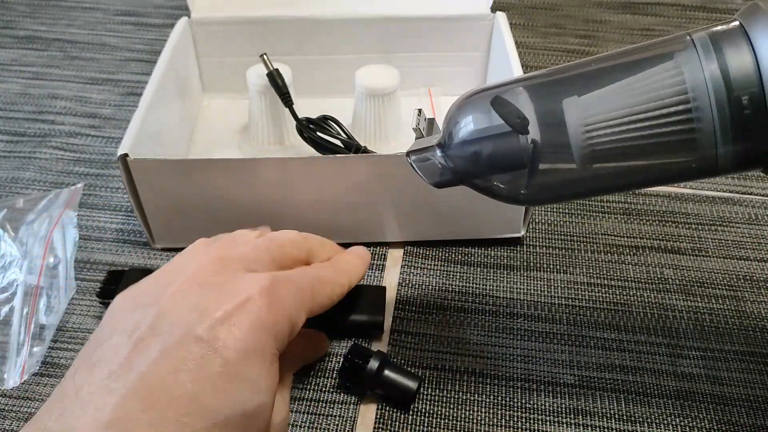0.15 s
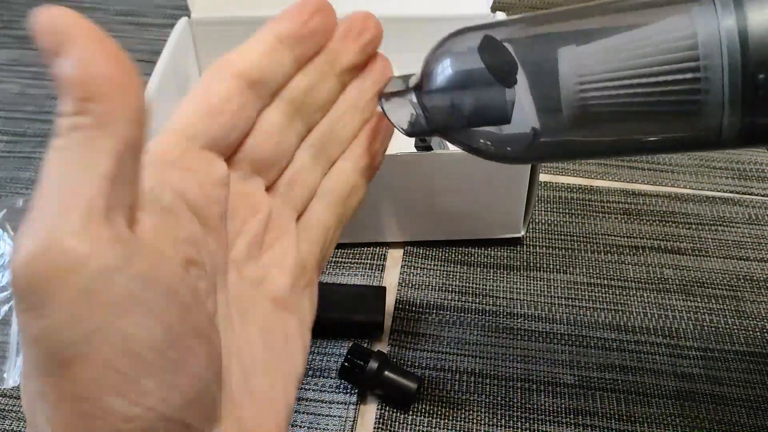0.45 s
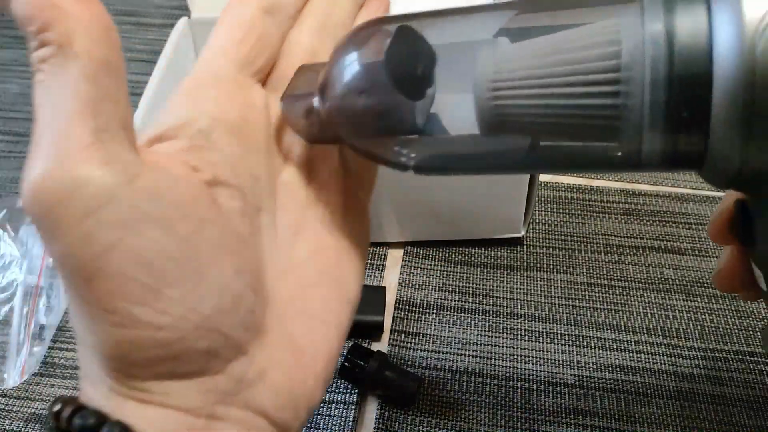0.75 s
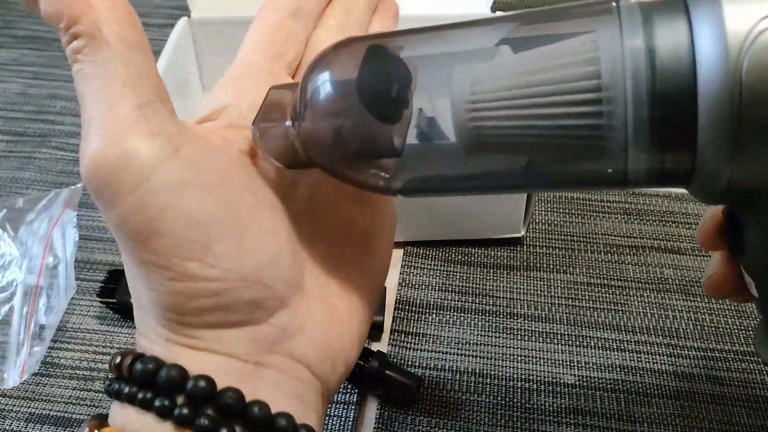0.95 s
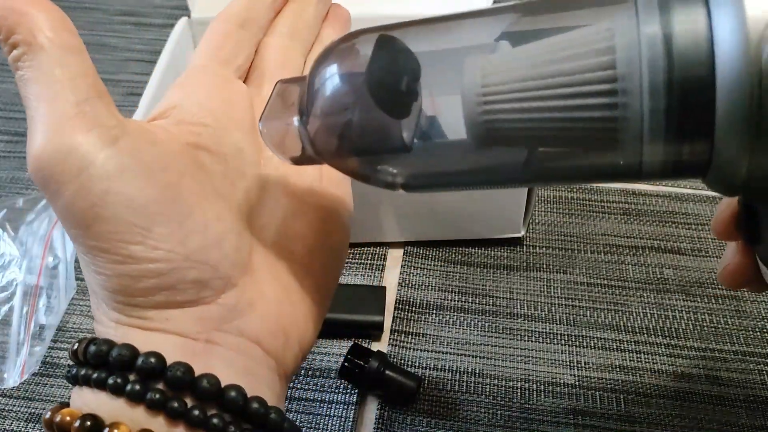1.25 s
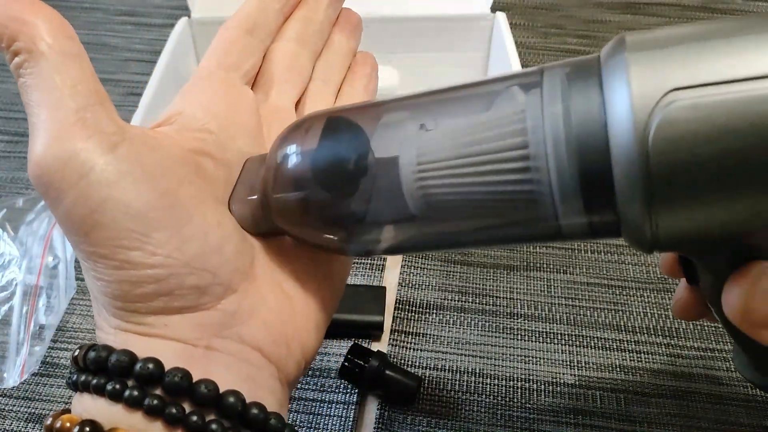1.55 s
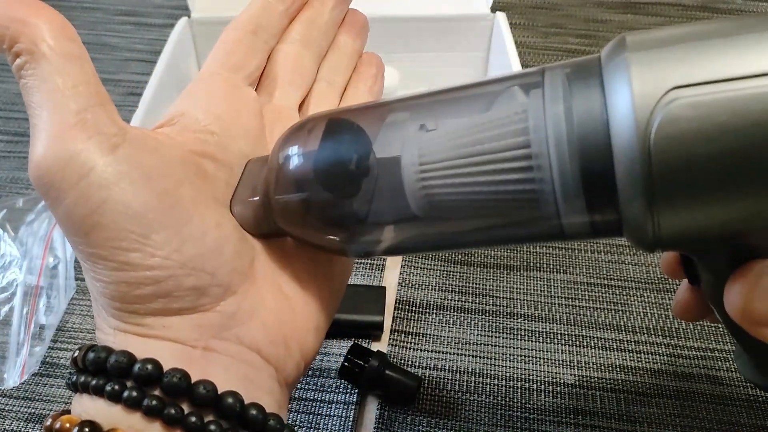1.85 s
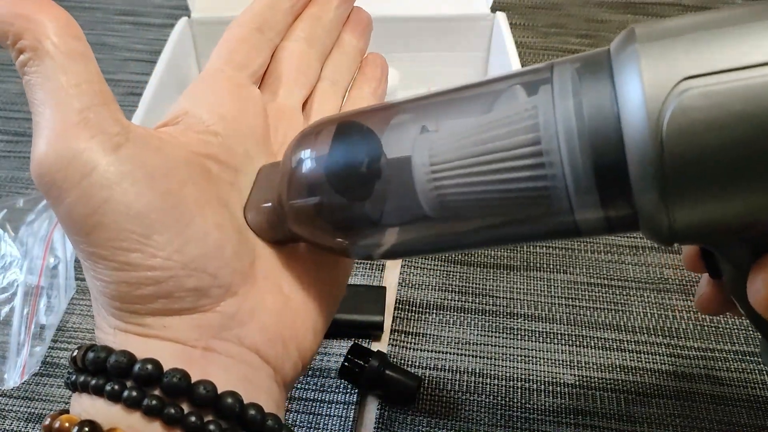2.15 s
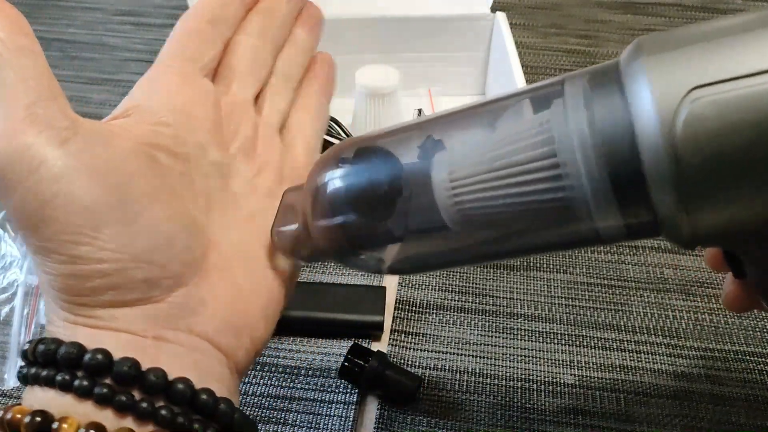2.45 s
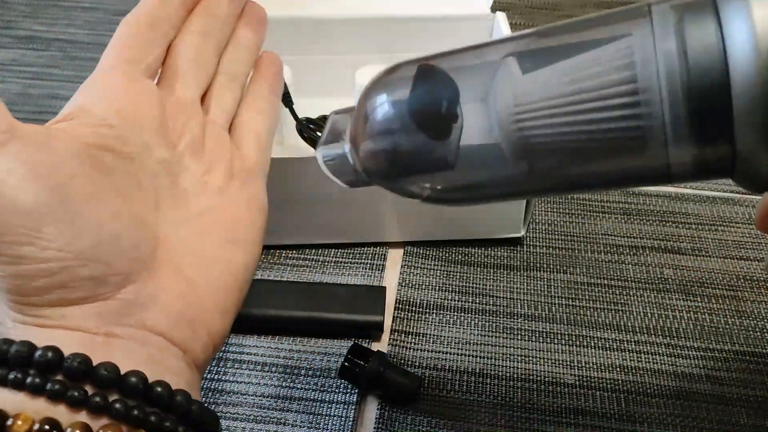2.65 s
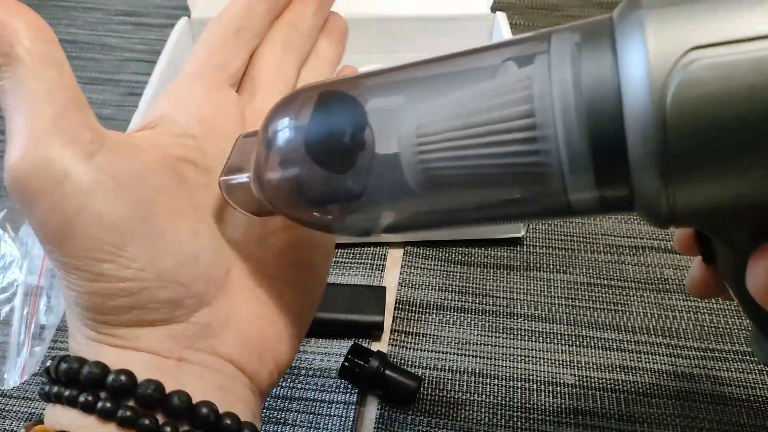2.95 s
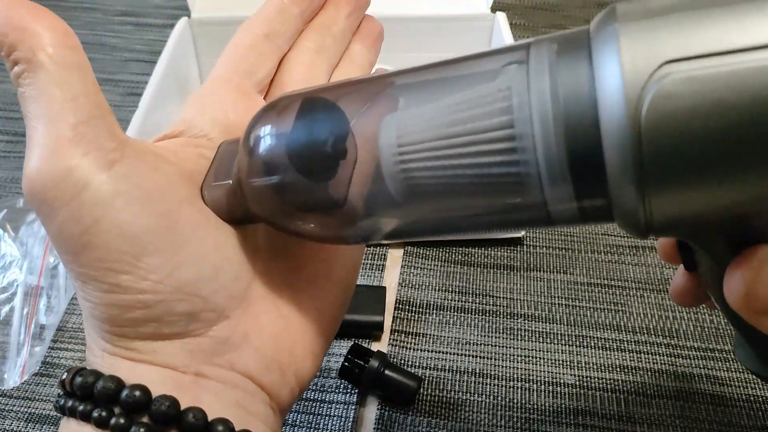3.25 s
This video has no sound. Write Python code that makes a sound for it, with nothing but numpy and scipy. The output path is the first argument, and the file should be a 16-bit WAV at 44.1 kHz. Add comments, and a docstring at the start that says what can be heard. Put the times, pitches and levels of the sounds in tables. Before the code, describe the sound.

A small cordless vacuum runs throughout, close to a stereo microphone: a clear high motor whine with overtones, bearing tones, rushing intake air, hiss and low puffs. At about 1.6 seconds a palm seals the nozzle with a soft thud; the air noise dies and the whine glides up, harder and rougher. Around 2.5 seconds air rushes back and pitch sinks. At 3.25 it is sealed again, to the end.

```python
"""Palm over a small vacuum's nozzle

A small cordless vacuum runs close to a stereo pair of microphones: a clean shaft whine with overtones,
ball-bearing tones, motor and exhaust noise, rushing intake air and low puffs of stray air.
Twice a palm seals the intake with a soft thud: rush, hiss, whistle and puffs die, and the unloaded fan
spins up and sings harder. After the first seal the palm lets go and it sinks back; the second lasts to the end."""
import sys
import numpy as np
from scipy import signal
from scipy.fft import rfft, irfft
from scipy.io import wavfile

SR = 44100
rng = np.random.default_rng(int(sys.argv[2]) if len(sys.argv) > 2 else 0)


def put_to_file(sound):
    """Save the sound as 16-bit audio at rate SR, in the file named by the first command-line argument."""
    columns = np.atleast_2d(sound).T  # one column per channel
    safe = np.clip(columns, -1, 1)
    whole_steps = np.round(safe * 32767)
    wavfile.write(sys.argv[1], SR, whole_steps.astype(np.int16))


N = 149940

LEFT_RIGHT = np.array([[1], [-1]])   # signs that split a difference between the two microphones


def from_db(db):
    """Decibels to amplitude gain."""
    return 10 ** (np.asarray(db) / 20)


def in_time(rows):
    """Each column of a curve, read at every sample; the first column is t/s."""
    t, *columns = np.transpose(rows)
    return [np.interp(np.arange(N) / SR, t, column) for column in columns]


def at_hz(points, hz):
    """A spectrum read on a log-frequency axis."""
    f, value = np.transpose(points)
    return np.interp(np.log(hz + 1), np.log(f), value)


def drift(rate_hz):
    """Random wandering with mean 0 and spread 1, its motion damped above the given rate."""
    drift_sr = 1000
    hz = np.fft.rfftfreq(4096, 1 / drift_sr)
    noise = rng.standard_normal(2 * len(hz) - 2)
    slow = irfft(rfft(noise) / (1 + (hz / rate_hz) ** 2))
    slow = np.interp(np.arange(N) / SR * drift_sr, np.arange(len(slow)), slow)
    return (slow - slow.mean()) / slow.std()


def lag(x, seconds):
    """Follows x with the given time constant."""
    r = np.exp(-1 / (seconds * SR))
    return signal.lfilter([1 - r], [1, -r], x)


def pan(db):
    """Left and right gains of constant power for a left minus right difference in dB."""
    gains = from_db(LEFT_RIGHT * db / 2)
    return gains / np.sqrt(np.mean(gains ** 2, axis=0))


def air_noise(spectrum):
    """Gently swirling noise: alike at both microphones in the low mids, opposed near 2-3 kHz, unrelated above."""
    # balance of the noise between the microphones: f/Hz, left minus right/dB
    balance = [(60, -3), (130, 1.5), (400, 0.8), (800, 0), (2400, 0.5), (3500, 3), (4900, -0.5),
               (5900, -4.5), (7000, -3), (7900, -2), (10000, 0), (12800, -3.5), (15000, -12.5)]
    # correlation of the noise at the two microphones: f/Hz, likeness (-1 to 1)
    likeness = [(50, -0.084), (130, 0.89), (300, 0.95), (640, 0.71), (1500, 0.0051), (2150, -0.69),
                (2850, -0.83), (3400, -0.15), (7000, -0.00033), (15000, 0.0076)]
    swirl_db, swirl_hz = 1.23, 20
    hz = np.fft.rfftfreq(N, 1 / SR)
    mid, side = rfft(rng.standard_normal((2, N)))
    alike = np.clip(at_hz(likeness, hz), -1, 1)
    both = np.sqrt((1 + alike) / 2) * mid + np.sqrt((1 - alike) / 2) * side * LEFT_RIGHT
    shaped = both * pan(at_hz(balance, hz)) * from_db(at_hz(spectrum, hz))
    # sqrt(SR / 2) turns level per Hz into amplitude
    return irfft(shaped, N) * np.sqrt(SR / 2) * from_db(swirl_db * drift(swirl_hz))


def buffet():
    """Stray air buffets the microphones in lumpy low puffs, stronger on the right."""
    # noise density before the level curve: f/Hz, density/dB per Hz
    puff_spectrum = [(25, -75), (70, -79), (120, -82), (250, -100)]
    # gain on that density: t/s, level/dB
    puff_level = [(0, 3), (.22, 3), (.27, 15), (.33, -3), (.52, -5), (.62, -7), (1.1, -8.5), (1.22, 10),
                  (1.6, 0), (2.55, 2), (2.66, 11), (2.8, -5), (3.0, 9), (3.24, 1)]
    lump_db, lump_hz, pan_db = 3, 13, -10
    level_db, = in_time(puff_level)
    return air_noise(puff_spectrum) * from_db(level_db + lump_db * drift(lump_hz)) * pan(pan_db)


def exhaust(strain, near_db):
    """Motor and exhaust noise, always there: louder under a sealed intake and slightly louder up close."""
    # noise density with the intake sealed: f/Hz, density/dB per Hz
    exhaust_spectrum = [(30, -80), (55, -81), (95, -82), (140, -78.5), (210, -67), (350, -63.5), (430, -71),
                        (700, -68), (1050, -70.5), (1500, -69.5), (2050, -63), (2500, -54), (3200, -55),
                        (3700, -57.5), (4300, -56), (5100, -56), (6500, -59), (7600, -62), (8300, -69.5),
                        (10300, -70), (12000, -74), (15500, -76)]
    open_db, nearness_share = -6, 0.2
    return air_noise(exhaust_spectrum) * from_db(open_db * (1 - strain) + nearness_share * near_db)


def nozzle_whistle():
    """A breathy whistle at the nozzle's edge: noise through two equal resonators in a row."""
    # whistle with the nozzle open: t/s, level/dB
    whistle_level = [(0, -23), (.42, -23), (.6, -31.5), (.9, -27), (1.1, -21.5), (1.33, -20.5),
                     (1.48, -19.5), (1.58, -31.5), (1.65, -22.5), (2.55, -25), (2.68, -25), (2.87, -25.5),
                     (2.98, -20), (3.1, -22), (3.25, -19.5)]
    whistle_hz, resonator_width_hz, pan_db = 11480, 950, -7
    level_db, = in_time(whistle_level)
    b, a = signal.iirpeak(whistle_hz, whistle_hz / resonator_width_hz, fs=SR)
    once = signal.lfilter(b, a, rng.standard_normal((2, N)))
    breath = signal.lfilter(b, a, once)
    return breath / breath.std() * from_db(level_db) * pan(pan_db)


def intake():
    """Air drawn through the open nozzle: low rush, hiss of nozzle and filter, and a high whistle."""
    # noise densities before their level curves: f/Hz, density/dB per Hz
    rush_spectrum = [(30, -87), (95, -80), (135, -62.5), (205, -53.5), (240, -57), (280, -55.5), (430, -57),
                     (458, -48.5), (490, -62.5), (545, -61), (630, -85), (790, -67.5), (1000, -99)]
    hiss_spectrum = [(500, -77.5), (900, -67.5), (1250, -66), (1550, -54.5), (2000, -60), (2400, -61),
                     (2850, -88), (3450, -52), (4150, -60), (4750, -53.5), (5800, -52.5), (7000, -54.5),
                     (8050, -68), (8600, -63.5), (10000, -66), (11500, -63.5), (13000, -64.5),
                     (15500, -68.5)]
    # gains on those densities: t/s, level/dB
    rush_level = [(0, 3.5), (.38, 3.5), (.5, -.5), (.85, -2.5), (1.05, -1), (1.38, 2.5), (1.6, -3.5),
                  (2.55, -1.5), (2.65, 4), (2.95, 1.5), (3.24, -1)]
    hiss_level = [(0, -0.6), (.45, 0.7), (.8, -1.4), (1.3, -.5), (1.6, -0.5), (2.57, 0), (2.8, -1.5),
                  (3.24, -1)]
    rush_db, = in_time(rush_level)
    hiss_db, = in_time(hiss_level)
    rush = from_db(rush_db) * air_noise(rush_spectrum)
    hiss = from_db(hiss_db) * air_noise(hiss_spectrum)
    return rush + hiss + nozzle_whistle()


def thuds():
    """The air column stops against the palm with a short low push."""
    # the palm meets the nozzle: t/s, envelope peak level/dB
    palm_hits = [(1.622, -36), (3.25, -38)]
    thud_hz, decay_s, pan_db = 60, 0.0063, -2
    out = np.zeros(N)
    for start_s, db in palm_hits:
        age = np.maximum(np.arange(N) / SR - start_s, 0)
        envelope = age / decay_s * np.exp(1 - age / decay_s)
        out += from_db(db) * envelope * np.sin(2 * np.pi * thud_hz * age)
    return out * pan(pan_db)


def shaft_angle(spin):
    """The shaft's running angle in radians, between its open and its sealed speed."""
    open_hz, sealed_hz, wobble_hz = 1191.5, 1324.3, 0.72
    hz = open_hz + (sealed_hz - open_hz) * spin + wobble_hz * drift(6)
    return 2 * np.pi * np.cumsum(hz) / SR


def tone(phasor, db, pan_db, lead_rad, seal):
    """One machine tone: open-intake air blurs it most, and its path to each microphone wanders."""
    flutter_open, flutter_sealed, flutter_hz = .27, .08, 35
    fade_db, path_wander_rad, path_hz = 1.1, .25, 2.5
    depth = flutter_open + (flutter_sealed - flutter_open) * seal
    flutter = 1 + depth * (drift(flutter_hz) + 1j * drift(flutter_hz))
    paths = []
    for side in (1, -1):   # left, right
        phase = path_wander_rad * drift(path_hz) + side * lead_rad / 2
        paths.append(from_db(fade_db * drift(path_hz)) * np.exp(1j * phase))
    start = np.exp(2j * np.pi * rng.random())
    wave = np.real(np.array(paths) * flutter * phasor * start)
    return wave / wave.std() * from_db(db) * pan(pan_db)


def bearing(angle, strain, spin, seal):
    """Two ball bearings add tones; the weaker rear one grows with speed, and sealed the pair beats 23 times a second."""
    # tones at whole shaft turns plus or minus the ball-pass rate; levels before nearness:
    # shaft turns, sign, open level/dB, sealed level/dB, left minus right/dB, left's lead/rad,
    # rear bearing relative to front at sealed speed/dB
    ball_tones = [(-2, 1, -45.5, -40.5, -2, 0, -25), (5, -1, -45, -24.5, -2, -2.2, -22),
                  (0, 1, -32, -25, -3, .2, -2), (6, -1, -35.5, -32, -2, .3, -9),
                  (1, 1, -37, -38, -3, 2.0, -12), (7, -1, -37.5, -38, -2, 1.4, -14),
                  (2, 1, -42, -42, -4, 1.5, -3)]
    front_pass, rear_pass = 2.883, 2.9007   # ball passes per shaft turn
    slip_rad, slip_hz = 0.14, 5.6
    rear_open_db = -9   # the rear bearing's drop at open speed
    front = front_pass * angle + slip_rad * drift(slip_hz)
    rear = rear_pass * angle + slip_rad * drift(slip_hz)
    out = 0
    for turns, sign, open_db, sealed_db, pan_db, lead_rad, rear_db in ball_tones:
        rear_share = from_db(rear_db + rear_open_db * (1 - spin ** 2))
        balls = np.exp(1j * sign * front) + rear_share * np.exp(1j * sign * rear)
        db = open_db + (sealed_db - open_db) * strain
        out = out + tone(np.exp(1j * turns * angle) * balls, db, pan_db, lead_rad, seal)
    return out


def overtones(angle, rise, seal):
    """Multiples of the shaft rate: with the fan's rise most grow and shift phase between the microphones."""
    # levels before nearness: multiple of shaft rate, open level/dB, sealed level/dB,
    # left minus right/dB, left's lead open/rad, left's lead sealed/rad
    shaft_multiples = [(2, -30.5, -24.5, 4, -.7, -2.0), (3, -33, -28.5, -3, -2.0, .5),
                       (4, -27.5, -23.5, -3, 2.5, 6.6), (5, -38, -33.5, -7, .8, 3.6),
                       (6, -41, -41, -5, 1, 1)]
    out = 0
    for multiple, open_db, sealed_db, pan_db, open_rad, sealed_rad in shaft_multiples:
        db = open_db + (sealed_db - open_db) * rise
        lead_rad = open_rad + (sealed_rad - open_rad) * rise
        out = out + tone(np.exp(1j * multiple * angle), db, pan_db, lead_rad, seal)
    return out


def whine(angle):
    """The clean once-per-turn tone of the shaft, wavering as the vacuum is moved about."""
    # whine before its waver: t/s, level/dB, left minus right/dB
    whine_level = [(0.03, -25, -20), (0.09, -23.5, -17), (0.28, -23.5, -16), (0.42, -23, -19),
                   (0.5, -22, -13.5), (0.81, -25, -9), (1.01, -22.5, -5.5), (1.47, -22.5, -7),
                   (1.58, -25, -5), (1.65, -21.5, -5.5), (1.76, -20, 2.0), (1.81, -22, -9),
                   (1.86, -19.5, 0), (2.29, -20, 0.5), (2.41, -19.5, 5), (2.56, -19, -0.5), (2.58, -22, -4),
                   (2.69, -22, -1.5), (2.73, -23, 5), (2.81, -19, -4.5), (3.03, -21.5, 0.5),
                   (3.2, -23, -0.5), (3.3, -19, -2), (3.38, -19.5, 3.5)]
    lead_rad, waver_db, waver_hz = -0.34, 0.76, 26   # lead of the left microphone
    db, pan_db = in_time(whine_level)
    gain = np.sqrt(2) * from_db(db + waver_db * drift(waver_hz))   # sqrt(2): the level is RMS
    return gain * pan(pan_db) * np.sin(angle + lead_rad / 2 * LEFT_RIGHT)


def scene():
    """The seal chokes the intake and the fan speeds up, lagging by its inertia; bearing tones follow the palm quickly."""
    # how far the palm seals the intake: t/s, seal (0 open to 1 sealed)
    palm_seal = [(0, 0.02), (1.61, 0), (1.665, 0.98), (2.515, 1), (2.565, 0), (3.23, 0), (3.28, 0.93),
                 (3.4, 1)]
    # overtones and bearing tones as the motor is brought closer: t/s, level/dB
    nearness = [(0, -7.5), (.35, -5), (.65, -0.5), (1.5, 2.2), (2.0, 0.6), (3.4, 0.5)]
    spin_lag_s, strain_rise_s, strain_fall_s = .208, 0.045, 0.027
    seal = np.clip(in_time(palm_seal)[0], 0, 1)
    near_db, = in_time(nearness)
    spin = lag(seal, spin_lag_s)
    # the lower of two lags: a slower rise than fall
    strain = np.minimum(lag(seal, strain_rise_s), lag(seal, strain_fall_s))
    angle = shaft_angle(spin)
    # overtones swell late with the fan's speed and drop fast at release
    rise = np.minimum(spin ** 2, strain)
    near_tones = overtones(angle, rise, seal) + bearing(angle, strain, spin, seal)
    motor = whine(angle) + from_db(near_db) * near_tones
    open_air = (1 - seal) * (intake() + buffet())
    return motor + exhaust(strain, near_db) + open_air + thuds()


def record(dry):
    """The microphone signal with its top cut steeply above 15.7 kHz."""
    steep_cut = signal.ellip(12, .1, 80, 15700, fs=SR, output="sos")   # 0.1 dB ripple, 80 dB stop
    return signal.sosfilt(steep_cut, dry)


dry = scene()
out = record(dry)
put_to_file(out)
```